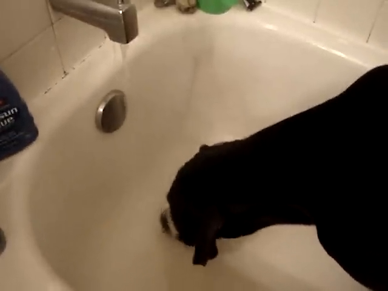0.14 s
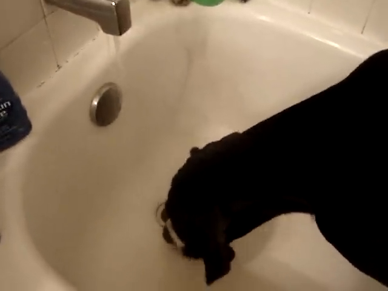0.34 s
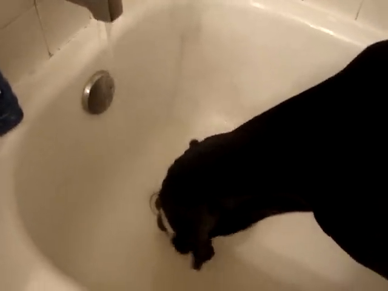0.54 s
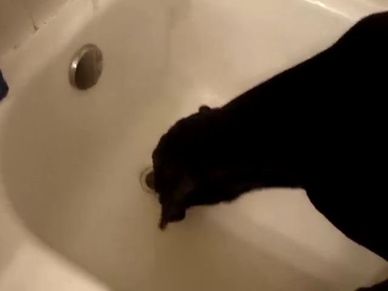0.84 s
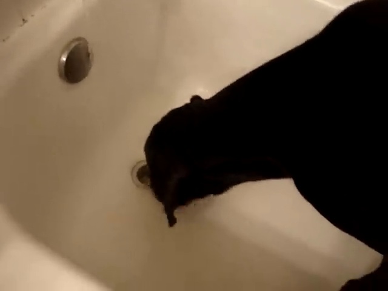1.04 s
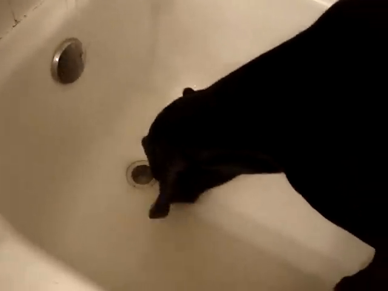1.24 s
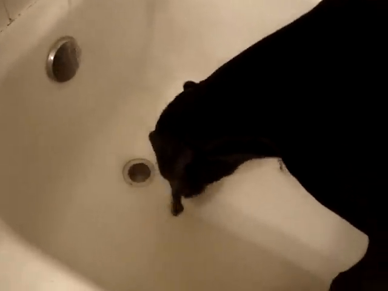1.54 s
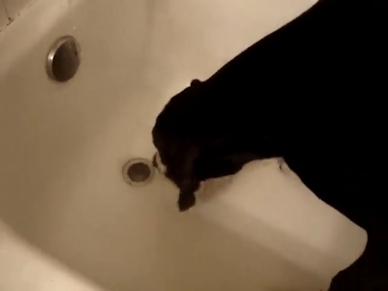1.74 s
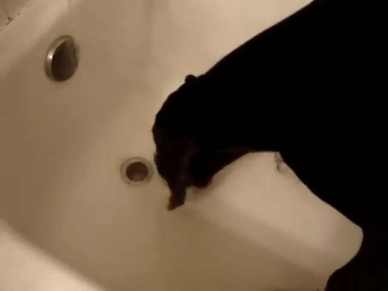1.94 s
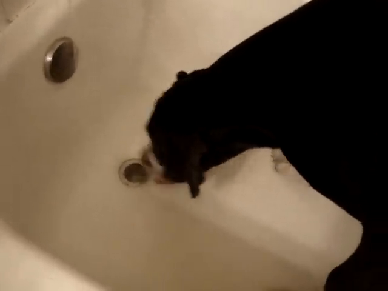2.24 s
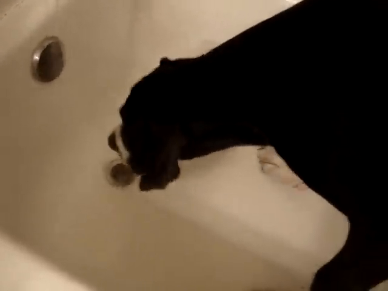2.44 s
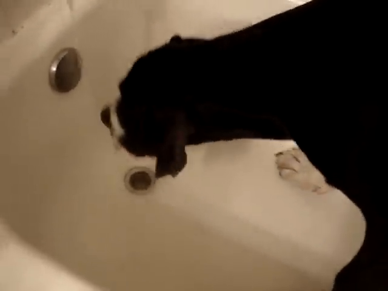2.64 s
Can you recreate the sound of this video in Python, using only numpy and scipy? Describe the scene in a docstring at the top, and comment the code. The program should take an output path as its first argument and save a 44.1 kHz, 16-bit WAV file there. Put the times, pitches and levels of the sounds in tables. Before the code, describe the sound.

A dog laps shallow water in an enamel tub, close up: uneven wet smacks, bubble pops and low hollow sloshes, ending near the close while a thin tap trickle hisses on in a small tiled bathroom.

```python
"""A tiled bathroom: a dog laps fast from the wet floor of an enamel tub while a thin trickle runs from the tap.
Each tongue smack is an air pocket popping, a swelling tone with a crack, plus scattered droplets and mist.
Low sloshes are bands of noise that ring the tub's modes; soft thumps push through its floor.
Bare bubble pops come during and between the smacks, and the room answers every pop. The trickle is patchy
hiss with fizzing droplets, and a low rumble passes underneath. Almost nothing sounds above 10 kHz."""
import sys
import numpy as np
from scipy import signal
from scipy.fft import rfft, irfft, next_fast_len
from scipy.io import wavfile
from scipy.ndimage import uniform_filter1d

SR = 44100
rng = np.random.default_rng(int(sys.argv[2]) if len(sys.argv) > 2 else 0)


def inscribe(sig):
    """Save sig as 16-bit PCM at rate SR to the path in sys.argv[1].

    A 1-D sig is mono; a 2-D sig holds one channel per row.
    Samples are clipped to [-1, 1] before scaling.
    """
    pcm = np.round(np.clip(np.atleast_2d(sig).T, -1, 1) * 32767)
    wavfile.write(sys.argv[1], SR, pcm.astype(np.int16))


N = 123479  # samples, 2.8 s


def amp(db):
    """Decibels to amplitude."""
    return 10 ** (np.asarray(db) / 20)


def unit(x):
    """The signal scaled to rms 1."""
    return x / np.sqrt(np.mean(x ** 2) + 1e-20)


def along(points, hz):
    """Read a table of (Hz, value) points at any frequency, on a log axis."""
    f, v = np.transpose(points)
    return np.interp(np.log(hz + 1), np.log(f + 1), v)


def curve(rows):
    """Join (seconds, value) rows by straight lines, one value per sample."""
    s, v = np.transpose(rows)
    return np.interp(np.arange(N) / SR, s, v)


def filtered(x, response):
    """The signal shaped by a response of frequency."""
    m = next_fast_len(len(x) + 8192)
    return irfft(rfft(x, m) * response(np.fft.rfftfreq(m, 1 / SR)), m)[:len(x)]


def bell(centre_hz, octaves):
    """A Gaussian band on a log axis; octaves is its standard deviation."""
    return lambda hz: np.exp(-.5 * (np.log2((hz + 1) / centre_hz) / octaves) ** 2)


def add(out, s, x):
    """Mix a sound in from s seconds, cutting it where the scene ends."""
    i = max(round(s * SR), 0)
    out[i:i + len(x)] += x[:len(out) - i]


def grains(s, hz, size, cycles, size_out):
    """Droplets: damped sines with a soft start, each down to 1/30 after the given cycles."""
    t = np.arange(320) / SR
    u = t * hz[:, None]
    decay = np.exp(-np.log(30) * u / cycles)
    g = size[:, None] * np.sin(2 * np.pi * u) * decay * (1 - np.exp(-u))
    at = np.round(s * SR).astype(int)[:, None] + np.arange(len(t))
    return np.bincount(at.ravel(), g.ravel(), size_out + SR)[:size_out]


# Spectrum of the thin stream. Each row: frequency in Hz, relative density in dB per Hz.
STREAM_SPECTRUM = [(15, -45), (25, -10), (128, -2.5), (367, 5), (638, 6), (862, 0.5), (1700, 4),
                   (4190, -1.5), (4760, 7), (5390, -4.5), (8690, 0.5), (10100, -1), (13100, -67),
                   (22000, -120)]
# Strength of the stream. Each row: time in seconds, rms level of the hiss in dB.
STREAM_LEVEL = [(0.0, -41.5), (1.73, -40.5), (2.8, -42)]
PATCHY_DB = 2.2  # rms wander of the hiss across time and frequency
FIZZ_PER_S, FIZZ_HZ, FIZZ_SPAN_OCT = 150, 3800, 0.745 * 3.61
FIZZ_DB = -18.5  # against the hiss


def trickle():
    """A thin stream: hiss whose level wanders in patches, with tiny ringing droplets in it."""
    z = signal.stft(rng.standard_normal(N), nperseg=512)[2]
    patches = uniform_filter1d(rng.standard_normal(z.shape), size=12, axis=0)
    patches = uniform_filter1d(patches, size=5, axis=1)
    hiss = signal.istft(z * amp(PATCHY_DB * unit(patches)), nperseg=512)[1][:N]
    hiss = unit(filtered(hiss, lambda hz: amp(along(STREAM_SPECTRUM, hz))))

    count = int(FIZZ_PER_S * N / SR)
    when, where, luck = rng.random((count, 3)).T
    hz = FIZZ_HZ * 2 ** (FIZZ_SPAN_OCT * (where - .5))
    size = amp(-4 * np.log(luck + 0.01))  # a few droplets stand out
    fizz = grains(when * N / SR, hz, size, 21, N)
    return amp(curve(STREAM_LEVEL)) * (hiss + amp(FIZZ_DB) * unit(fizz))


# How fast the tiled room dies away. Each row: frequency in Hz, t60 in seconds.
ROOM_DECAY = [(1400, 0.24), (9700, 0.031)]
ROOM_DB = -8  # energy of the tail's response against the direct sound


def room(x, count):
    """The sound plus its tail in fresh noise about 3 ms later, each frequency dying at its own speed."""
    hz, t, z = signal.stft(rng.standard_normal(count), SR, nperseg=256)
    fade = amp(-60 * t / along(ROOM_DECAY, hz)[:, None])
    tail = signal.istft(z * fade, SR, nperseg=256)[1]
    wet = amp(ROOM_DB) * signal.fftconvolve(np.pad(x, (130, 0)), tail / np.linalg.norm(tail))
    return wet + np.pad(x, (0, len(wet) - len(x)))


POP_RISE, POP_GLIDE = 0.44, 0.0074  # peak as a share of the pop length; pitch climb


def burst(hz, cycles):
    """An air pocket pops: a short swelling tone that climbs a little."""
    u = np.arange(1024) / SR * hz / cycles  # time in pop lengths
    v = u / POP_RISE
    swell = v ** 2 * np.exp(2 * (1 - v))
    return swell * np.sin(2 * np.pi * cycles * u * (1 + POP_GLIDE * (u - .5)))


DROPS_PER_SMACK, DROP_CYCLES = 600, 10.2
DROP_SIZE_DB = 1.4  # scale of the random boost per droplet
TREBLE_GROWS = 0.2  # small droplets are louder by this power of pitch
SPRAY_RISE_S = 0.00033


def spray(hz, octaves, t60, sag):
    """A dying shower of droplets around one pitch, sagging in octaves per second; rms near 1 at its start."""
    r = rng.standard_normal(DROPS_PER_SMACK)
    boost = np.minimum(rng.exponential(size=DROPS_PER_SMACK), 4)
    at = rng.random(DROPS_PER_SMACK) * np.clip(t60, .03, .6) * .7
    pitch = np.clip(hz * 2 ** (octaves * r - sag * at), 500, 10500)
    life = max(t60, .03)
    size = amp(DROP_SIZE_DB * boost - 60 * at / life) * pitch ** TREBLE_GROWS
    size *= 1 - np.exp(-at / SPRAY_RISE_S)
    x = grains(at, pitch, size, DROP_CYCLES, SR // 2)
    # turn the mean power of the whole shower into its power at the start
    return x / np.sqrt(np.mean(x ** 2) * len(x) / SR / life * np.log(1e6))


# Air resonances between muzzle and tub wall. A plain list of pitches in Hz.
HOLLOW_PITCHES = [2040, 2410, 2765, 3336, 4120]
HOLLOW_WIDE_HZ, HOLLOW_DB = 120, 2  # width; level of each resonance added to the plain sound


def hollow(hz):
    """The hollow by the muzzle lifts a few fixed pitches, each a resonator beside the direct sound."""
    damping = 1j * hz * HOLLOW_WIDE_HZ
    return 1 + amp(HOLLOW_DB) * sum(damping / (c * c - hz * hz + damping) for c in HOLLOW_PITCHES)


# Tongue smacks and drips. Each row: cue in seconds (sound begins 1 ms before), level in dB, pop pitch in Hz,
# pop length in cycles, spray against the pop in dB, spray spread in octaves, spray t60 in seconds,
# fine mist against the pop in dB.
TONGUE_SMACKS = [(0.0044, -32, 1610, 5.5, -3.5, 0.6, 0.18, -13),
                 (0.163, -32, 4700, 5.3, -6.5, 0.66, 0.19, -30),
                 (0.2156, -21, 2700, 1.9, -17, 0.73, 0.11, -13),
                 (0.2589, -8.5, 2910, 11, -12, 0.51, 0.33, -27),
                 (0.5185, -27.5, 3120, 6.7, -12, 0.77, 0.22, -10.5),
                 (0.569, -30, 4800, 8.5, -24, 0.64, 0.16, -7),
                 (0.582, -31, 2290, 4.4, -4.5, 0.54, 0.16, -26),
                 (0.5962, -19.5, 2300, 6.1, -12, 0.72, 0.29, -18.5),
                 (0.7312, -12, 3390, 10.2, -25.5, 0.43, 0.21, -34),
                 (0.787, -29.5, 5100, 5, -8, 0.22, 0.092, -28),
                 (0.868, -15, 8250, 5.9, -14, 0.18, 0.32, -22),
                 (0.9059, -21, 2370, 14, -6, 0.68, 0.29, -19),
                 (0.9624, -29, 1860, 5.1, -6.5, 0.43, 0.23, -41),
                 (1.0971, -29.5, 3400, 5.5, -9.5, 0.83, 0.3, -10.5),
                 (1.1465, -25, 3620, 2.4, -9.5, 0.74, 0.22, -40),
                 (1.179, -27, 3730, 15, -7.5, 0.77, 0.26, -9),
                 (1.2169, -16, 1985, 4.7, -12, 0.49, 0.29, -13.5),
                 (1.311, -26, 1460, 6.5, -8, 0.7, 0.35, -23),
                 (1.4131, -30.5, 2524, 30, -23, 0.49, 0.66, -26),
                 (1.4636, -27.5, 3340, 9.1, -16.5, 0.38, 0.28, -44),
                 (1.4793, -24, 2496, 34, -40, 0.17, 0.25, -29),
                 (1.5294, -21, 1986, 10.5, -10.5, 0.3, 0.23, -16),
                 (1.5893, -16.5, 3420, 9, -12, 0.63, 0.36, -18),
                 (1.648, -21.5, 5380, 4, -14, 0.58, 0.24, -31),
                 (1.833, -28.5, 2060, 8.2, -8, 0.415, 0.25, -4),
                 (1.8733, -27, 2105, 7.5, 0, 0.75, 0.27, -14),
                 (1.8821, -9.5, 3790, 6.1, -17.5, 0.53, 0.32, -22),
                 (1.9482, -22.5, 8300, 12, -7, 0.31, 0.15, -42),
                 (2.063, -28, 3030, 9.1, -9, 0.51, 0.24, -29),
                 (2.135, -23, 2150, 3.7, -18, 0.55, 0.14, -9.5),
                 (2.1694, -26.5, 2760, 8.3, -5, 0.66, 0.14, -25),
                 (2.1814, -16, 2275, 4.3, -16, 0.47, 0.33, -26),
                 (2.3796, -30.5, 6070, 6, -9.5, 0.39, 0.44, -30),
                 (2.4506, -21, 5410, 5.6, -11.5, 0.63, 0.2, -33.5),
                 (2.494, -31.5, 3780, 5, 1.5, 0.39, 0.2, -25),
                 (2.4988, -20, 2710, 6.4, -8.5, 0.33, 0.26, -23),
                 (2.7492, -36.5, 1600, 4.1, -11, 0.51, 0.26, -4)]
SAG_OCT_PER_S = 1.58  # droplets grow lower as the spray dies
MIST_HZ, MIST_OCT, MIST_T60_S = 6620, 0.39, 0.24
SLAP_S, SLAP_DB = 0.00025, 17.5  # crack as the tongue lands: decay, level over a one-cycle pop


def smacks():
    """The tongue cracks on water, an air pocket pops, droplets scatter near its pitch, and fine mist hisses."""
    out = np.zeros(N)
    for s, db, hz, cycles, spray_db, octaves, t60, mist_db in TONGUE_SMACKS:
        pop = burst(hz, cycles)
        fade = np.exp(-np.arange(len(pop)) / SR / SLAP_S)
        pop += amp(SLAP_DB) / cycles * rng.standard_normal(len(pop)) * fade  # more cycles, less crack
        drops = amp(spray_db) * spray(hz, octaves, t60, SAG_OCT_PER_S)
        drops += amp(mist_db) * spray(MIST_HZ, MIST_OCT, MIST_T60_S, 0)
        add(out, s - .001, amp(db) * filtered(drops, hollow))
        add(out, s - .001, amp(db) * room(pop, count=SR // 3))
    return filtered(out, lambda f: f ** 2 / (f ** 2 + 400 ** 2))  # thin out the lows


# Ringing modes of the enamel tub. Each row: frequency in Hz, level in dB, t60 in seconds.
TUB_MODES = [(192, -12, .3), (350, -12, .3), (481, -13, .28), (647, -7, .42), (711, -15, .3),
             (770, -19, .25)]
# Low sloshes. Each row: cue in seconds (sound begins 3 ms before), level in dB, centre in Hz,
# width in octaves, gulp t60 in seconds, drive of the tub ring in dB.
LOW_SLOSHES = [(0.213, -18.5, 370, 1, 0.28, -20), (0.259, -28, 933, 0.22, 0.53, 11),
               (0.475, -49, 630, 0.11, 0.26, 13.5), (0.566, -24, 557, 0.6, 1, -1.5),
               (0.586, -11.5, 732, 0.22, 0.28, -13.5), (0.911, -26.5, 754, 0.55, 0.47, 8.5),
               (1.03, -28.5, 360, 0.9, 1, -4), (1.177, -24, 226, 1, 1, -3),
               (1.208, -10, 694, 0.23, 0.25, -12.5), (1.244, -18.5, 463, 0.2, 0.34, 0),
               (1.299, -21, 484, 0.3, 0.12, -4), (1.53, -22.5, 530, 0.82, 0.79, -5),
               (1.589, -16, 890, 0.25, 0.24, -5), (1.835, -13, 338, 0.5, 0.18, -4),
               (1.886, -16, 686, 0.055, 0.34, 1.5), (2.068, -20, 630, 0.15, 0.25, -13),
               (2.133, -21, 333, 0.42, 0.63, 0), (2.18, -17, 650, 0.25, 0.3, -10),
               (2.452, -18, 500, 0.6, 0.15, -12), (2.493, -15, 466, 0.12, 0.2, -7)]
SLOSH_RISE_S, RING_RISE_S = 0.0073, 0.0013
REACH_OCT = 0.26  # a slosh rings the modes near its own centre
SKIRT_DB = -14.5  # broad body an octave below each gulp


def sloshes():
    """A low gulp of water in banded noise, and the tub's modes swelling under it."""
    out, t = np.zeros(N), np.arange(SR // 2) / SR
    for s, db, hz, octaves, t60, ring_db in LOW_SLOSHES:
        def body(f):
            return bell(hz, octaves)(f) + amp(SKIRT_DB) * bell(hz / 2, 1)(f)
        gulp = unit(filtered(rng.standard_normal(len(t)), body))
        gulp *= (1 - np.exp(-t / SLOSH_RISE_S)) * amp(-60 * t / t60 - 13.5)

        ring = np.zeros(len(t))
        for f, level, life in TUB_MODES:
            a, b = rng.standard_normal(2)  # level varies a little, phase falls anywhere
            strength = amp(level + 0.5 * a - 60 * t / life) * bell(hz, REACH_OCT)(f)
            ring += strength * np.sin(2 * np.pi * f * t + 3 * b)
        ring *= 1 - np.exp(-t / RING_RISE_S)
        add(out, s - .003, amp(db) * (gulp + amp(ring_db) * ring))
    return out


# Low thumps through the tub floor. Each row: start in seconds, level in dB.
FLOOR_THUMPS = [(0.257, -29.5), (0.868, -33.5), (1.592, -34.5), (1.886, -33), (1.951, -35)]
THUMP_S = 0.023  # decay time


def thumps():
    """Each thump is one sudden low push that swings back through zero as it dies."""
    out, u = np.zeros(N), np.arange(SR // 5) / SR / THUMP_S
    for s, db in FLOOR_THUMPS:
        add(out, s, amp(db) * (1 - np.exp(-8 * u)) * (1 - u) * np.exp(-u))
    return out


# Bare bubble pops, without spray, during and between the smacks.
# Each row: start in seconds, level in dB, pitch in Hz.
BUBBLE_POPS = [(0.262, -9, 3200), (0.2785, -10, 2700), (0.312, -23, 2540), (0.331, -23.5, 1380),
               (0.298, -15, 2660), (0.384, -29.5, 1070), (0.519, -33, 2080), (0.631, -27, 2400),
               (1.243, -24, 1880), (1.529, -20.5, 1240), (1.585, -21.5, 1335), (2.1802, -21.5, 2730),
               (2.501, -15.5, 4030), (2.514, -14.5, 2900), (2.582, -30.5, 1850)]
BUBBLE_CYCLES = 5.2


def bubbles():
    """Bare pops of trapped air, answered by the room."""
    out = np.zeros(N)
    for s, db, hz in BUBBLE_POPS:
        add(out, s, amp(db) * room(burst(hz, BUBBLE_CYCLES), count=SR // 3))
    return out


# A passing low rumble. A single row: start in seconds, end in seconds, level in dB.
PASSING_RUMBLE = (1.01, 1.4, -56)


def rumble():
    """A narrow band of noise around 90 Hz, faded in and out over 20 ms."""
    start, end, db = PASSING_RUMBLE
    gate = np.interp(np.arange(N) / SR, [start, start + .02, end - .02, end], [0, 1, 1, 0])
    return amp(db) * gate * unit(filtered(rng.standard_normal(N), bell(90, 0.13)))


def scene():
    """All layers summed, one channel."""
    return (trickle() + smacks() + sloshes() + thumps() + bubbles() + rumble())[None]


TOP_HZ = 10150


def record(dry):
    """Band limit: almost nothing sounds above about 10 kHz."""
    return filtered(dry[0], lambda hz: 1 / (1 + (hz / TOP_HZ) ** 200))[None]


dry = scene()
out = record(dry)
inscribe(out)
```